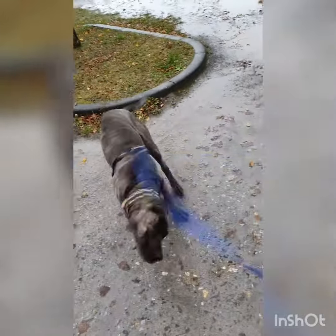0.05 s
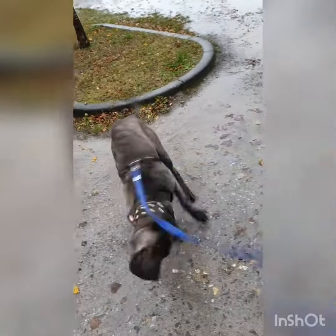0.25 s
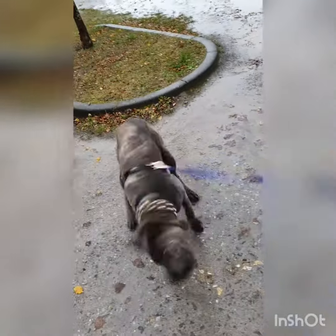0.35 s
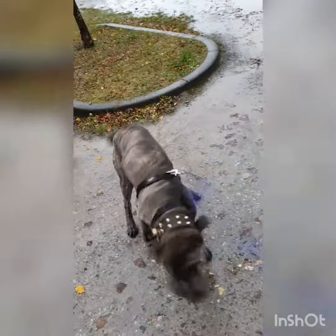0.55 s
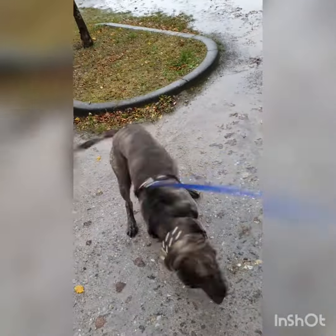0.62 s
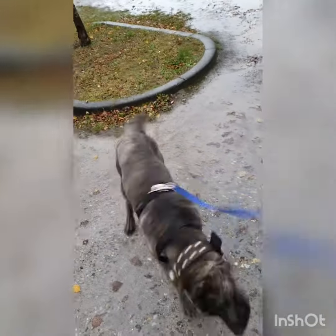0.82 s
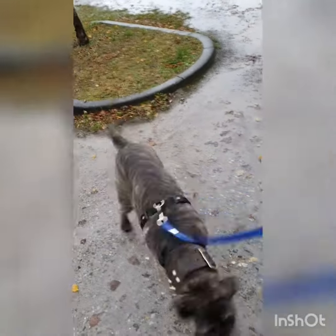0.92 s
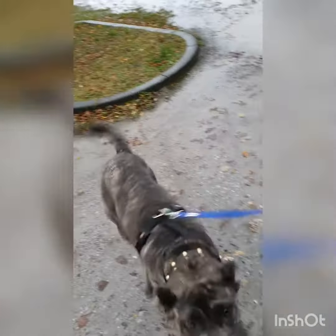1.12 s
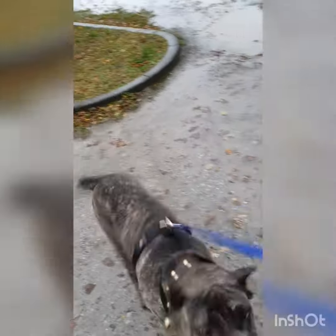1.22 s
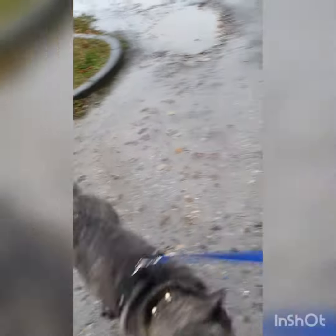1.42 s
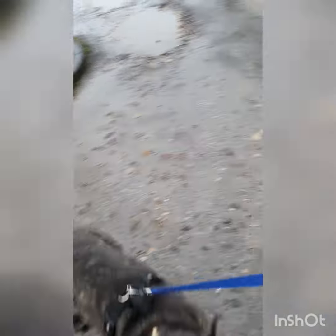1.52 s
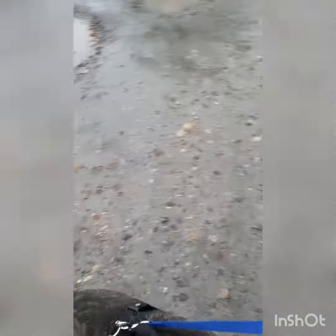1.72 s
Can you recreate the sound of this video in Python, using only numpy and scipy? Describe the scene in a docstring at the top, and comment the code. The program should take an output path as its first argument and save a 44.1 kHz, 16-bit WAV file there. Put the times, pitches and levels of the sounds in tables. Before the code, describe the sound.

A leash's metal clasp clacks and jingles as a dog walks on gritty ground.

```python
"""The metal clasp of a dog's leash clacks as it is knocked, and jingles and slides in its ring.
The dog, in a harness, noses along damp, gritty ground close by: its soft paws pat down,
a claw clacks, the grit crunches as it slips, and brief high pings come from the grit or the clasp.
Behind it lie a steady outdoor hiss, a low rumble of air on the microphone and a dull rustle."""
import sys
import numpy as np
from scipy import signal
from scipy.fft import rfft, irfft, next_fast_len
from scipy.io import wavfile
from scipy.ndimage import uniform_filter1d, map_coordinates

SR = 44100
rng = np.random.default_rng(int(sys.argv[2]) if len(sys.argv) > 2 else 0)


def dump(signal):
    """Clip the signal to [-1, 1] and save it as 16-bit WAV at the path in sys.argv[1]."""
    limited = np.clip(np.atleast_2d(signal).T, -1, 1)
    pcm = np.round(limited * 32767).astype(np.int16)
    wavfile.write(sys.argv[1], SR, pcm)


N = 77175
TIME = np.arange(N) / SR

# Sharp clacks of the clasp or a claw; each has its own strength, treble limit and pitch.
# (time [s], relative knock level [dB], relative crack level [dB], left over right [dB],
#  treble limit of the knock [Hz], pitch [Hz])
HARD_HITS = [(0.0645, -37, -26, -10, 4000, 1900), (0.0926, -26.5, -32, 5.5, 6000, 1770),
             (0.1197, -38.5, -36, 0, 5000, 1970), (.191, -25, -25, 0, 5030, 1660),
             (0.2058, -17.5, -27, 5, 2660, 1820), (0.2133, -7.5, -5.5, 1, 3700, 2060),
             (0.3262, -0.5, 0, -0.5, 6650, 1820), (0.4309, -22.5, -14.5, 0, 4400, 1950),
             (0.5417, -5.5, 0, 0, 2320, 1920), (0.552, -34, -31, -19, 2230, 1900),
             (0.6345, -10.5, 2, 4.5, 2050, 1670), (0.7652, -8, -6.5, -2, 6940, 2035),
             (0.8693, -31, -6, -15, 2600, 1970), (1.0142, -24, -29, -4, 1900, 1640),
             (1.1242, -32.5, -40, 11.5, 3370, 1570), (1.1902, -27.5, -20.5, -2, 1390, 1350),
             (1.2482, -21, -11.5, -10.5, 4180, 2010), (1.485, -26, -21, -7.5, 2310, 2030),
             (1.4912, -39, -33, 2, 3900, 2050)]
# The brief tones in a knock: (multiple of the pitch, relative level [dB], time to fade by 60 dB [s])
KNOCK_TONES = [(.62, -1, 0.0039), (1, 3.5, 0.0064), (1.46, -6, 0.0039), (1.75, -5, 0.0079),
               (2.05, -5.5, 0.0025), (2.7, -20, 0.0024), (3.45, -4, 0.0066)]
# The tone colour of the bright crack: (frequency [Hz], relative level [dB])
CRACK_COLOUR = [(600, -22), (1300, -14.5), (3000, -2.5), (5500, 5), (7000, -15), (8300, -2), (11000, -3.5),
                (13500, -3.5), (16000, 2.5)]


def clasp_and_claw_clacks():
    """A hard hit, a quick bounce and a moment of chatter make a knock, with a bright crack on top."""
    knock_boost_db, crack_boost_db = 6.5, 2
    typical_bounce_s, bounce_db = .00073, -14.5
    chatter_fade_s, chatter_db = .0012, -18
    low_cut_hz, treble_resonance = 880, 1.8
    t = TIME[:SR // 50]
    knock, crack = np.zeros((2, 2, N))
    for start, knock_db, crack_db, pan_db, treble_hz, pitch_hz in HARD_HITS:
        noise = rng.standard_normal((3, len(t)))  # shared, left, right
        chatter = (noise[0] + .5 * noise[1:]) * from_db(chatter_db) * np.exp(-t / chatter_fade_s)
        bounce = np.arange(len(t)) == int(typical_bounce_s * SR * (.5 + rng.random()))
        force = pan(pan_db) * ((t == 0) - from_db(bounce_db) * bounce + chatter)
        tones = sum(from_db(db - 60 * t / fade_s) * np.cos(2 * np.pi * multiple * pitch_hz * t)
                    for multiple, db, fade_s in KNOCK_TONES)
        edge = 2 * SR * np.tan(np.pi * treble_hz / SR)
        treble_cut = signal.bilinear([edge ** 2], [1, edge / treble_resonance, edge ** 2], SR)
        tones = signal.lfilter(*treble_cut, tones / np.linalg.norm(tones))
        struck = signal.fftconvolve(force, tones[None], axes=1)  # every push starts the tones anew
        add(knock, start, from_db(knock_db + knock_boost_db) * struck)
        add(crack, start, from_db(crack_db + crack_boost_db) * force)
    bass_cut = signal.butter(4, low_cut_hz, btype="high", fs=SR, output="sos")
    return signal.sosfilt(bass_cut, knock) + colour(crack, CRACK_COLOUR)


# Touches that set the metal ringing: (time [s], relative low ring [dB], relative high ring [dB])
CLASP_TOUCHES = [(.065, -68, -42), (0.092, -30, -38), (0.113, -38, -33), (.120, -51, -47),
                 (0.197, -33, -33), (0.205, -43, -17), (0.211, -35, -30), (0.277, -31.5, -27.5),
                 (0.302, -31, -32), (0.325, -11, -20), (0.333, -44, -21), (.343, -15.5, -22),
                 (0.366, -34, -32), (0.398, -38, -30.5), (0.422, -59, -25), (0.428, -20.5, -29),
                 (0.44, -57, -33), (0.4894, -27, -18.5), (0.501, -25.5, -22), (0.511, -31, -33),
                 (0.523, -27, -20), (0.538, -19.5, -11), (0.538, -26, -39), (0.553, -50, -18),
                 (0.632, -19, -14.5), (0.745, -41, -43), (0.763, -51, -13.5), (0.824, -38, -49),
                 (0.851, -47, -34), (0.869, -49, -18), (0.873, -59, -41), (0.971, -22.5, -32.5),
                 (0.982, -54, -55), (1.007, -39, -23), (1.013, -17.5, -24), (1.018, -28, -26),
                 (1.028, -19.5, -26), (1.038, -23.5, -25), (1.071, -20, -32), (1.078, -45, -28),
                 (1.124, -15.5, -28), (1.131, -27, -19.5), (1.199, -26, -40), (1.206, -52, -23.5),
                 (1.247, -56, -16.5), (1.247, -21.5, -36), (1.408, -29, -39), (1.414, -34, -34),
                 (1.477, -30.5, -39), (1.485, -58, -30), (1.493, -26.5, -25.5), (1.531, -44, -43),
                 (1.546, -60, -40), (1.572, -29, -39)]
# The metal slides in its ring: (time [s], length [s], relative level [dB])
CLASP_SLIDES = [(1.021, .075, -43), (1.349, 0.018, -52.5), (1.417, .04, -59), (1.47, 0.04, -62),
                (1.512, .075, -50)]
# The clasp's low and high tones: (pitch [Hz], relative level [dB], time to fade by 60 dB [s])
LOW_TONES = [(5220, -17, 0.029), (5586, -3, 0.053), (5675, -6.5, 0.048), (7300, -17.5, 0.027)]
HIGH_TONES = [(14150, -21, .012), (14980, -10, .018), (15190, -1, .04), (15330, -4, .022), (15480, 0, .04),
              (15640, -11, .018)]


def clasp_jingles():
    """Each touch rings the clasp's low and high tones; sliding keeps the low ones sounding."""
    low_trim_db, high_trim_db, shimmer_db = -12, -3.5, -20
    out = np.zeros((2, N))
    for start, low_db, high_db in CLASP_TOUCHES:
        add(out, start, from_db(low_db + low_trim_db) * metal_ring(LOW_TONES))
        add(out, start, from_db(high_db + high_trim_db) * metal_ring(HIGH_TONES))
    for start, length, db in CLASP_SLIDES:
        rubbing = rng.standard_normal((1, SR // 2))
        singing = signal.fftconvolve(rubbing, metal_ring(LOW_TONES), "valid", axes=1)
        singing /= np.sqrt(uniform_filter1d(np.mean(singing ** 2, axis=0), size=400))  # even level
        swell = signal.windows.tukey(int(length * SR), .5)
        add(out, start, from_db(db) * swell * singing[:, :len(swell)])
    out *= pan(-3.5)
    return out + from_db(shimmer_db) * tail(out, fade_s=.16)


def metal_ring(tones):
    """One touch: tones close in pitch waver together, and the clasp buzzes against its ring."""
    detune, stereo_spread_turns, rise_s = .0015, .2, .0022
    t = TIME[:SR // 6]
    out = np.zeros((2, len(t)))
    for hz, db, fade_s in tones:
        turns = hz * (1 + detune * rng.normal()) * t + rng.random()
        turns = turns + stereo_spread_turns * rng.normal(size=(2, 1))
        out += from_db(db - 60 * t / fade_s) * np.sin(2 * np.pi * turns)
    buzz = 1 + .16 * flutter(len(t), smooth_s=.003)
    out *= (1 - np.exp(-t / rise_s)) * buzz
    return out / out[:, :SR // 100].std()  # every touch starts equally strong


# The paws land: (time [s], relative level [dB], starting pitch [Hz])
PAW_STEPS = [(0.192, -32, 169), (.237, -28, 492), (.365, -31.5, 890), (.417, -32, 690), (0.452, -31.5, 430),
             (.476, -32, 570), (0.483, -33.5, 238), (.579, -28.5, 580), (.673, -36, 467),
             (0.678, -36.5, 197), (.6842, -22.5, 670), (.779, -32, 710), (0.7828, -21, 510),
             (1.189, -38, 530), (1.610, -32.5, 457), (1.625, -27.5, 446), (1.628, -35.5, 225),
             (1.657, -27.5, 406)]
# The tone colour of the damp splat: (frequency [Hz], relative level [dB])
SPLAT_COLOUR = [(100, -4), (300, -19), (700, 7.5), (1400, 2.5), (3000, -14), (8000, -13)]


def paw_pats():
    """A soft pad traps air on the damp ground: a short, hollow, rising note and a small splat."""
    rise_s, fade_s, pitch_rise_per_s = .0009, .0038, 11.3
    hollow_db, splat_db = -2, -15
    t = TIME[:SR // 20]
    press = (1 - np.exp(-(t / rise_s) ** 2)) * np.exp(-t / fade_s)
    press /= press.max()
    hollow, force = np.zeros((2, N))
    for start, db, hz in PAW_STEPS:
        note = np.sin(2 * np.pi * hz * t * (1 + pitch_rise_per_s * t / 2))
        add(hollow, start, from_db(db) * press * note)
        add(force, start, from_db(db) * press)
    splat = colour(force * wide_noise(width=.067), SPLAT_COLOUR)
    return pan(-1.8) * (from_db(hollow_db) * hollow + from_db(splat_db) * splat)


# The paws scuff the grit: (time [s], length [s], crunch level [dB], sizzle level [dB])
PAW_SCUFFS = [(0.065, 0.004, -52, -43.5), (0.094, 0.0055, -48, -45.5), (0.114, 0.0067, -42, -62),
              (0.1883, 0.013, -35.5, -37.5), (0.206, 0.0098, -30.5, -36.5), (0.227, 0.048, -44.5, -51),
              (0.273, 0.0041, -34.5, -35), (0.294, 0.015, -40, -36.5), (0.32, 0.026, -43.5, -40.5),
              (0.362, 0.011, -47, -47), (0.402, 0.021, -42, -45.5), (0.431, 0.014, -41, -41),
              (0.463, 0.018, -37, -44), (0.487, 0.017, -47, -38), (0.505, 0.0071, -37.5, -29),
              (0.52, 0.021, -37.5, -38.5), (0.538, 0.017, -60, -27), (0.575, 0.0081, -37, -62),
              (0.602, 0.0019, -38.5, -49), (0.613, 0.0036, -44, -39.5), (0.634, 0.0088, -35.5, -39.5),
              (0.649, 0.03, -46.5, -47), (0.729, 0.002, -42.5, -42), (0.744, 0.02, -49.5, -44.5),
              (0.761, 0.03, -40.5, -50), (0.809, 0.025, -45.5, -41), (0.843, 0.015, -45.5, -45.5),
              (0.865, 0.007, -32, -46), (0.918, 0.0025, -55, -46), (0.961, 0.025, -45, -45),
              (1.004, 0.013, -43.5, -37), (1.027, 0.014, -46, -61), (1.06, 0.022, -52, -44.5),
              (1.119, 0.012, -45.5, -40), (1.135, 0.034, -47, -50), (1.185, 0.018, -49, -42.5),
              (1.242, 0.014, -43, -41), (1.324, 0.0025, -57, -48), (1.487, 0.0061, -37.5, -38.5)]
# The tone colours of the lower crunch and the higher sizzle: (frequency [Hz], relative level [dB])
CRUNCH_COLOUR = [(150, -14), (500, 6.5), (1100, 4.5), (2000, 11), (3000, 4), (4300, 5.5), (7000, -4.5),
                 (15000, -30)]
SIZZLE_COLOUR = [(1000, -26), (3500, -4.5), (7000, 3), (8000, -0.5), (9300, 0.5), (13000, -3.5),
                 (16000, -27)]


def paw_scuffs():
    """The grit slips for as long as each scuff lasts, then quickly falls quiet."""
    rise_s, fade_s = .0018, .0046
    t, grains = TIME[:SR // 10], slipping_grit()
    crunch_level, sizzle_level = np.zeros((2, N))
    for start, length, crunch_db, sizzle_db in PAW_SCUFFS:
        slip = np.minimum(t / rise_s, 1) * np.exp(-np.maximum(t - length, 0) / fade_s)
        add(crunch_level, start, from_db(crunch_db) * slip)
        add(sizzle_level, start, from_db(sizzle_db) * slip)
    other_grains = np.roll(grains, N // 2, axis=1)
    crunch = colour(crunch_level * grains, CRUNCH_COLOUR)
    sizzle = colour(sizzle_level * other_grains, SIZZLE_COLOUR)
    return pan(-.33) * (crunch + sizzle)


def slipping_grit():
    """Tiny grains each ring briefly at their own pitch over a sliding noise; both come in clumps."""
    grains_per_s, fade_cycles, lowest_hz, highest_hz = 5000, 4.1, 700, 16000
    size_spread_db, widest_pan_db, slide_db, clump_db = 3, 30, -5.5, 2.5
    t, grains = TIME[:SR // 100], np.zeros((2, N))
    for when, pitch, weight, side in rng.random((int(grains_per_s * N / SR), 4)):
        hz = lowest_hz * (highest_hz / lowest_hz) ** pitch
        strength = hz * from_db(size_spread_db * min(-np.log(weight), 4))
        ping = np.exp(-hz * t / fade_cycles) * np.sin(2 * np.pi * hz * t)
        add(grains, when * N / SR, strength * pan(widest_pan_db * (2 * side - 1)) * ping)
    grit = grains / grains.std() + from_db(slide_db) * wide_noise(width=.62)
    grit *= from_db(clump_db * flutter(N, smooth_s=.004))
    return grit / grit.std()


# Brief high pings from the grit or the clacking clasp: (time [s], level [dB], pitch [Hz])
PINGS = [(0.43, -26, 3940), (0.646, -31.5, 9000), (0.7317, -27.5, 12920), (.732, -44, 8300),
         (1.247, -30.5, 4130), (1.376, -49, 7300)]


def high_pings():
    """Each ping is one high tone that swells and dies away in an instant."""
    rise_s = .0018
    t, out = TIME[:SR // 20], np.zeros((2, N))
    swell = t / rise_s * np.exp(1 - t / rise_s)
    for start, db, hz in PINGS:
        add(out, start, from_db(db) * swell * np.sin(2 * np.pi * hz * t))
    return out


# The dog moves across, so its sound reaches the left ear ever later: (time [s], delay [samples])
LEFT_EAR_DELAY = [(0, 2.78), (.9, 4.8), (1.4, 10.34), (1.75, 16.3)]
# The tone colour of the outdoor echo: (frequency [Hz], relative level [dB])
ECHO_COLOUR = [(100, -19), (1000, 10), (5000, 7.5), (12000, 9.5), (15500, -21)]


def outdoors(sound):
    """The sound reaches the left ear late; the surroundings scatter back a faint echo."""
    left = map_coordinates(sound[0], [np.arange(N) - curve(LEFT_EAR_DELAY)], order=5)
    echo = from_db(-21.5) * colour(tail(sound, fade_s=.26), ECHO_COLOUR)
    return np.array([left, sound[1]]) + echo


# The tone colours of the three background noises: (frequency [Hz], relative level [dB])
HISS_COLOUR = [(30, 12), (150, 9), (280, -6.5), (450, 4.5), (800, 1.5), (1500, -3), (3000, -3.5),
               (6000, -5), (10000, -10.5), (15500, -9.5)]
RUMBLE_COLOUR = [(20, -29), (40, -17), (60, -0.5), (72, -0.5), (85, -1.5), (120, -17), (200, -18.5),
                 (400, -23), (2000, -60)]
RUSTLE_COLOUR = [(80, -50), (220, -1.5), (430, 6), (700, 2), (1200, -19.5), (4000, -59), (15000, -36)]
# How loud each one is as time passes: (time [s], level [dB])
HISS_LEVEL = [(0, -43), (.15, -48), (.45, -43.5), (.7, -48.5), (.93, -51), (1.15, -47), (1.4, -50),
              (1.55, -48), (1.75, -44)]
RUMBLE_LEVEL = [(0, -47.5), (.2, -50.5), (.55, -49), (.75, -54.5), (1, -68), (1.15, -50.5), (1.27, -46),
                (1.32, -42.5), (1.42, -48), (1.75, -52.5)]
RUSTLE_LEVEL = [(0, -61), (.15, -68), (.47, -55), (.7, -56), (1.45, -61.5), (1.58, -53.5), (1.652, -52),
                (1.75, -47)]


def background():
    """Outdoor hiss, air rumbling on the microphone, and a dull rustle as the dog comes near."""
    hiss = from_db(curve(HISS_LEVEL)) * colour(wide_noise(width=.92), HISS_COLOUR)
    rumble = from_db(curve(RUMBLE_LEVEL)) * colour(wide_noise(width=.8), RUMBLE_COLOUR)
    rustle = from_db(curve(RUSTLE_LEVEL)) * colour(wide_noise(width=.4), RUSTLE_COLOUR)
    return hiss + rumble + rustle


def from_db(db):
    """Turn decibels into a number to multiply a sound by."""
    return 10 ** (np.asarray(db) / 20)


def curve(rows):
    """Join (time, value) points with straight lines, giving a value at every sample."""
    return np.interp(TIME, *np.transpose(rows))


def pan(db):
    """Left and right volumes; a positive number moves the sound to the left."""
    return from_db(np.array([[db], [-db]]) / 2)


def colour(sound, spectrum):
    """Make some frequencies louder and others softer; white noise keeps its overall power."""
    size = 2 * next_fast_len(N)
    hz, db = np.transpose(spectrum)
    frequencies = np.arange(size // 2 + 1) * SR / size
    gain = from_db(np.interp(np.log(frequencies + 1), np.log(hz), db))
    gain /= np.sqrt(np.mean(gain ** 2))
    # Fold the filter forward in time, so nothing is heard before the sound starts.
    cepstrum = irfft(np.log(gain))
    cepstrum[1:size // 2] *= 2
    cepstrum[size // 2 + 1:] = 0
    return irfft(rfft(sound, size) * np.exp(rfft(cepstrum)))[..., :N]


def wide_noise(width):
    """Stereo white noise; width 0 is the same in both ears, 1 is unrelated."""
    mid, side = rng.standard_normal((2, N))
    return (mid + width * side * np.array([[1], [-1]])) / np.sqrt(1 + width ** 2)


def flutter(samples, smooth_s):
    """A random wobble with a typical size of 1."""
    wobble = uniform_filter1d(rng.standard_normal(samples), size=int(smooth_s * SR))
    return wobble / wobble.std()


def tail(sound, fade_s):
    """A blurred echo, about as strong as the sound, that fades by 60 dB in fade_s seconds."""
    t = TIME[:SR // 2]
    echoes = rng.standard_normal((2, len(t))) * from_db(-60 * t / fade_s) * (t > .005)
    echoes /= np.sqrt(np.sum(echoes ** 2, axis=1, keepdims=True))
    return signal.fftconvolve(sound, echoes, axes=1)[:, :N]


def add(track, start_s, sound):
    """Mix a sound into a track at the given time."""
    start = max(int(start_s * SR), 0)
    track[..., start:start + sound.shape[-1]] += sound[..., :N - start]


def scene():
    """The leash and the dog's paws over the background."""
    air = background()
    dog = clasp_jingles() + clasp_and_claw_clacks() + paw_pats() + high_pings() + paw_scuffs()
    return outdoors(dog) + air


def record(dry):
    """Clip any peaks beyond full scale and cut the very highest treble."""
    cutoff_hz = 16200
    treble_cut = signal.ellip(10, .1, 80, cutoff_hz, fs=SR, output="sos")
    return signal.sosfilt(treble_cut, np.clip(dry, -1, 1))


dry = scene()
out = record(dry)
dump(out)
```